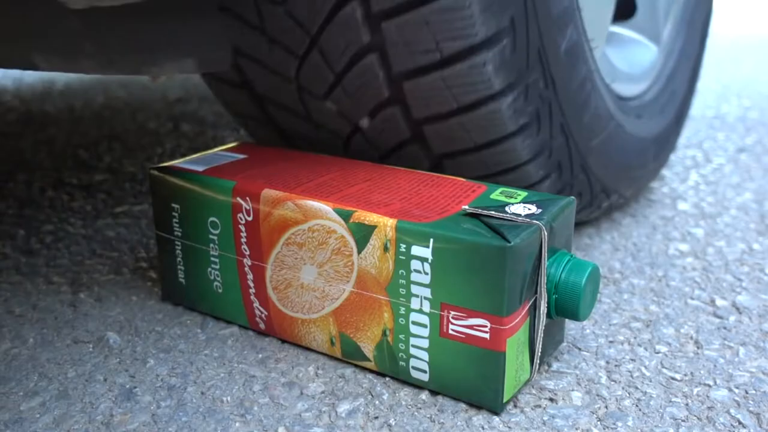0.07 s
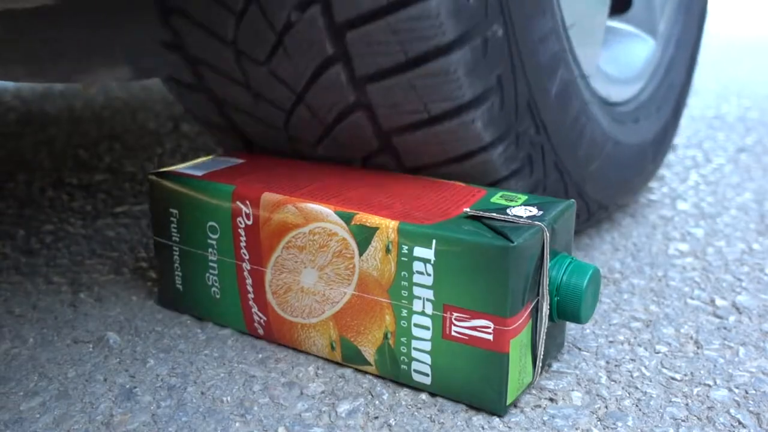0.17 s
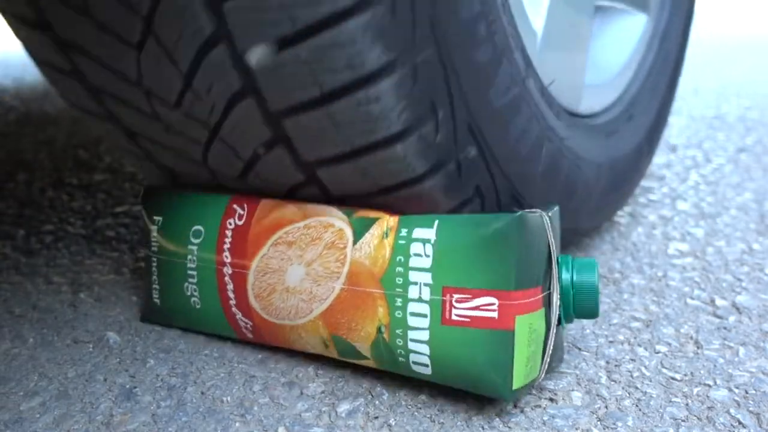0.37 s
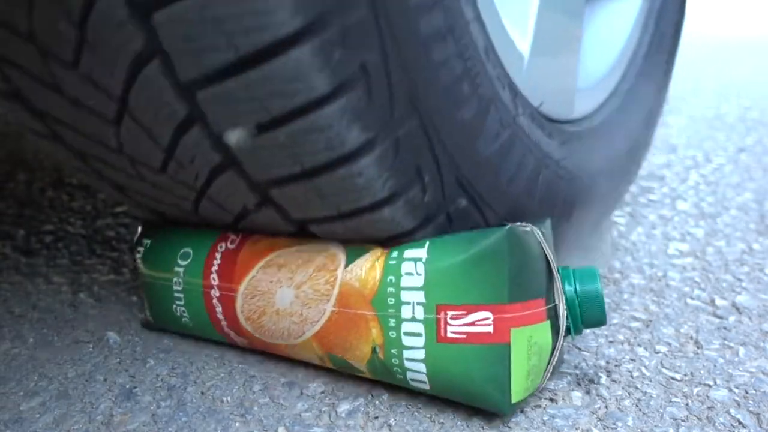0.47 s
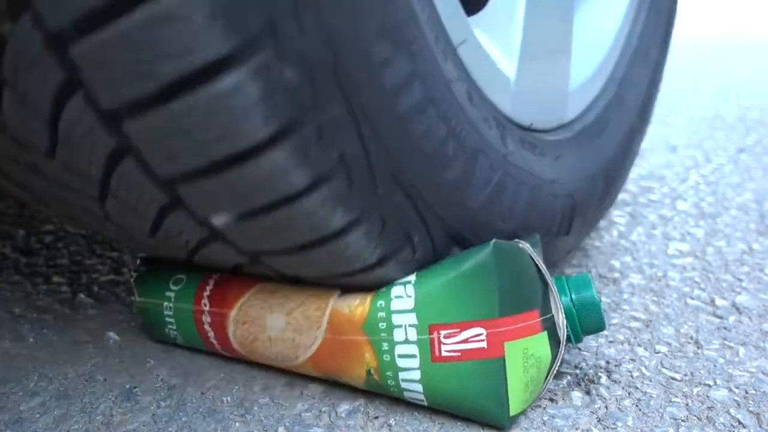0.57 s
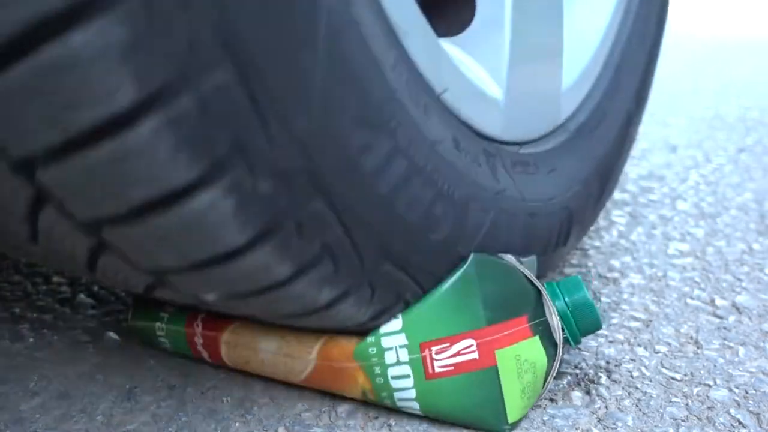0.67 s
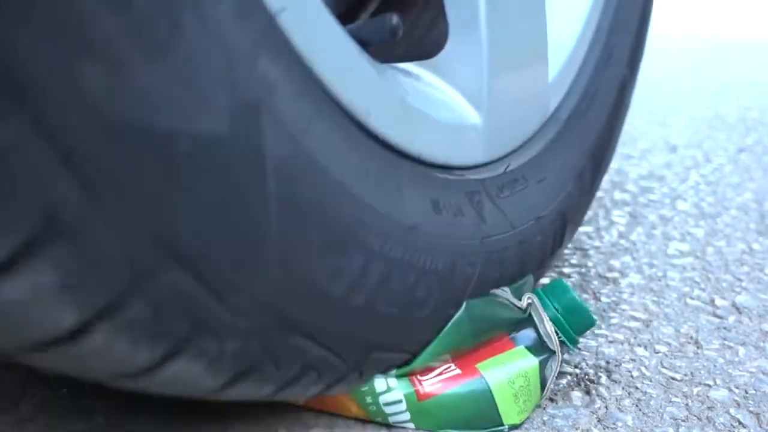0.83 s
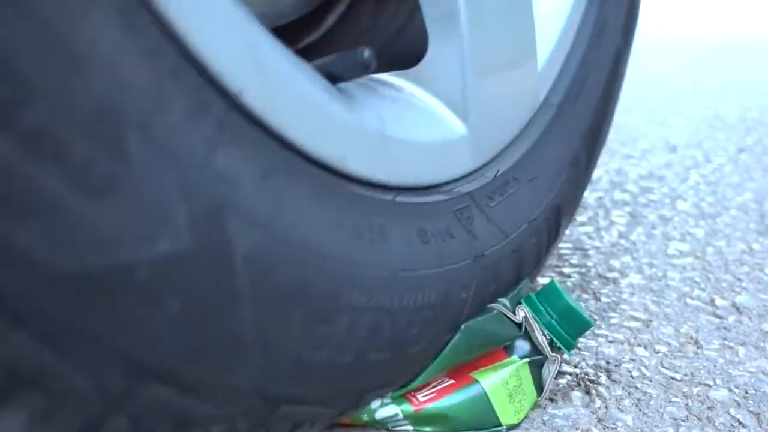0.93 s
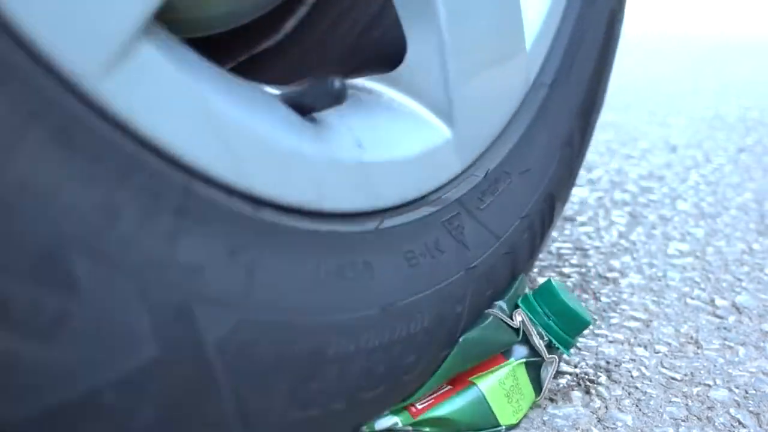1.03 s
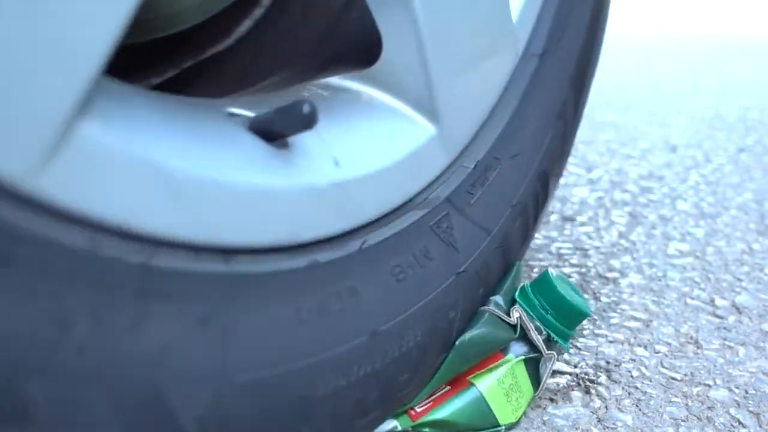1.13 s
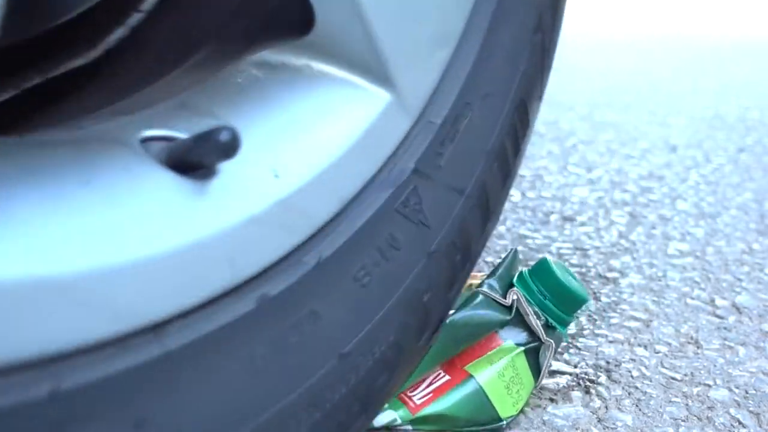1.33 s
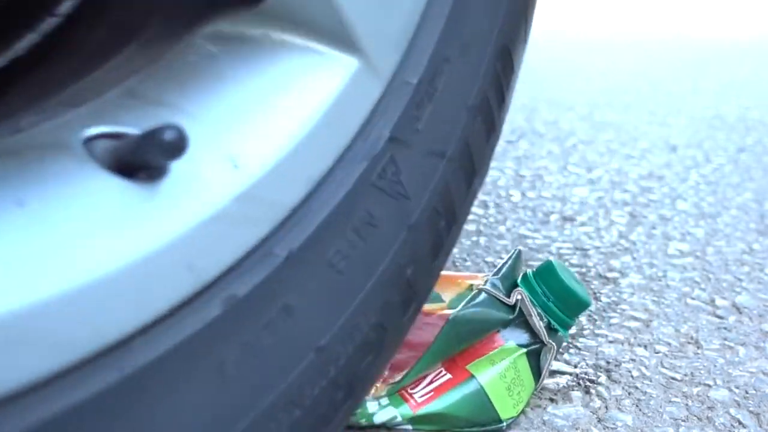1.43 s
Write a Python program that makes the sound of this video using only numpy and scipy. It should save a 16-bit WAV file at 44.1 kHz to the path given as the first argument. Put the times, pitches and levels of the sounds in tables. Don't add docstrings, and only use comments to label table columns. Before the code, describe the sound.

A drink carton is crushed by a car tyre, very close and dry, outdoors. Faint street hum until 0.2 s, then a dense burst of hollow booms, sharp cracks and creasing to 0.4. At 0.45 a seam pops and flutters; bright hissing air with short gliding whistles swells from 0.5 to 0.9, then fades. Card ticks from 0.97, cap snaps at 1.08, then faint rustle and gritty rolling to about 1.5.

```python
import sys
import numpy as np
from scipy import signal
from scipy.fft import rfft, irfft
from scipy.io import wavfile
from scipy.ndimage import uniform_filter1d

SR = 44100
rng = np.random.default_rng(int(sys.argv[2]) if len(sys.argv) > 2 else 0)


def generate_wav(signal):
    frames = np.transpose(np.atleast_2d(signal))
    scaled = np.clip(frames, -1, 1) * 32767
    pcm = np.round(scaled).astype(np.int16)
    wavfile.write(sys.argv[1], SR, pcm)


def field_ratio(decibels):
    return 10 ** (np.asarray(decibels, dtype=float) / 20)


N = 66150
BAND_EDGE_HZ = 11100


def evened(x):
    return x / np.sqrt(np.mean(x ** 2) + 1e-20)


def read(points, hz):
    f, value = np.transpose(points)
    return np.interp(np.log(hz + 1), np.log(f + 1), value)


def curve(rows, t, axis=1):
    rows = np.array(rows)
    return np.interp(t, rows[:, 0], rows[:, axis])


def add(mix, s, sound):
    part = mix[..., round(s * SR):][..., :sound.shape[-1]]
    part += sound[..., :part.shape[-1]]


def coloured(x, tone):
    gain = field_ratio(read(tone, np.fft.rfftfreq(x.shape[-1], 1 / SR)))
    return irfft(rfft(x) * gain, x.shape[-1])


def resonate(x, hz, width):
    turn = np.exp(2j * np.pi * np.cumsum(hz * np.ones(x.shape[-1])) / SR)
    r = np.exp(-np.pi * width / SR)
    return 2 * (turn * signal.lfilter([1 - r], [1, -r], x / turn + 1e-18)).real


def ring(x, hz, width):
    return resonate(resonate(x, hz, width), hz, 2 * width)


def modes(drive, table):
    return evened(sum(field_ratio(db) * evened(ring(drive, f, w)) for f, w, db in table))


# (f/Hz, level/dB)
STREET_TONE = [(25, -2), (70, -5), (120, -6), (350, -18), (600, -12), (950, -25), (2800, -26),
               (11000, -44.5)]
# (f/Hz, level/dB)
ROLL_TONE = [(30, -28), (90, -1.5), (300, -12.5), (1200, -11), (2300, -13.5), (3500, -22), (5300, -30.5),
             (11000, -41.5)]
# (t/s, level/dB)
ROLL_LEVEL = [
    (1.15, -52.5),
    (1.25, -55),
    (1.41, -49),
    (1.46, -53.5),
]
STREET_DB, STREET_FADE_S = -52.5, 0.42


def street():
    t = np.arange(N) / SR
    noise = rng.standard_normal((2, 3, N))
    wide = noise[:, :1] + coloured(noise[:, 1:], [(100, -21.5), (1000, -6.0), (6000, 2.5)])
    rolling = np.clip(t / STREET_FADE_S - 1, 0, 1)
    lumps = field_ratio(evened(uniform_filter1d(rng.standard_normal(N), size=2000)))
    hum = evened(coloured(wide[0], STREET_TONE)) * field_ratio(STREET_DB) * (1 - rolling)
    tyre = evened(coloured(wide[1], ROLL_TONE)) * field_ratio(curve(ROLL_LEVEL, t)) * rolling
    return lumps * (hum + tyre)


# (f/Hz, width/Hz, level/dB)
RUSTLE_FOLDS = [(1940, 310, -0.5), (3010, 330, -4.5), (4090, 460, -1)]
RUSTLE_S, RUSTLE_LEN_S, RUSTLE_DB = 1.25, 0.23, -51.5


def rustle():
    u = np.arange(0, 1, 1 / (SR * RUSTLE_LEN_S))
    noise = rng.standard_normal((4, 16000))
    unsteady = field_ratio(3.3 * evened(uniform_filter1d(noise[3], size=300)))
    drive = (noise[0] + 0.35 * noise[1:3]) * unsteady
    swell = np.sin(np.pi * u ** 1.66) ** 2
    return RUSTLE_S, field_ratio(RUSTLE_DB) * swell * modes(drive, RUSTLE_FOLDS)[:, :len(u)]


# (f/Hz, width/Hz, level/dB)
CAP_MODES = [(5600, 1200, 1), (3900, 700, -2), (2700, 700, -4), (790, 400, -9), (6900, 900, -6),
             (8200, 1500, -14)]
CAP_S, CAP_DB, CAP_T60_S, CAP_LOW_HZ = 1.0750, -18, 0.012, 500
CAP_CLICK_DB, CAP_BITE_DB, CAP_TAIL = -2.5, 22, 0.086


def cap():
    t = np.arange(2000) / SR
    noise = rng.standard_normal((3, 2000))
    noise = noise[0] + 0.38 * noise[1:] + field_ratio(CAP_BITE_DB) * (np.arange(2000) == 4)
    rings = modes(noise, CAP_MODES) * (1 + CAP_TAIL * field_ratio(50 * t / CAP_T60_S))
    click = field_ratio(CAP_CLICK_DB) * np.exp(-t / 0.00054) * np.clip(noise, -4, 4)
    snap = field_ratio(CAP_DB - 60 * t / CAP_T60_S) * (rings + click)
    snap = signal.lfilter(*signal.butter(2, CAP_LOW_HZ, "high", fs=SR), snap)
    return CAP_S, snap * np.array([[.84], [1.19]])


# (f/Hz, correlation/1)
PORT_LIKENESS = [(60, 0.94), (1200, 0.9), (2600, 0.98), (5500, 0.68), (11600, 0.86)]
# (f/Hz, phase/rad)
PORT_LAG = [(2900, -0.048), (5000, -0.96), (11000, -1.41)]


def hiss(field_db, patchy_db, flicker_db):
    frames, hz = N // 64 + 5, np.fft.rfftfreq(256, 1 / SR)[:, None]
    a, b, c, d, patches = rng.standard_normal((frames, 129, 5)).T
    t = np.arange(frames)[None] * 64 / SR
    gain = field_ratio(field_db(hz, t)) * (hz < BAND_EDGE_HZ) * np.ones_like(a)
    gain = gain / np.sqrt((gain ** 2).mean(0))
    flicker = evened(uniform_filter1d(patches[:1], size=4, axis=1))
    patches = uniform_filter1d(patches, size=4, axis=0)
    patches = evened(uniform_filter1d(patches, size=20, axis=1))
    same = np.clip(read(PORT_LIKENESS, hz), -1, 1)
    left = a + 1j * b
    right = same * left + np.sqrt(1 - same ** 2) * (c + 1j * d)
    right = right * np.exp(-1j * read(PORT_LAG, hz))
    z = np.array([left, right]) * gain * field_ratio(patchy_db * patches + flicker_db * flicker)
    return evened(signal.istft(z, nperseg=256, noverlap=192)[1][:, :N])


# (f/Hz, level/dB)
SLIT_TONE = [(59, -48), (100, -25.5), (661, -13), (1480, -8.5), (1700, -6), (6470, 2.5), (11000, 2),
             (14300, -26), (22000, -120)]
# (f/Hz, level/dB)
GAP_TONE = [(59, -57.5), (100, -14.5), (553, -19.5), (635, -1.5), (1770, -4), (4200, -3), (11000, -12.5),
            (14300, -41.5), (22000, -120)]
# (t/s, f/Hz)
MOUTH = [
    (.62, 8800),
    (.80, 5640),
    (.93, 3900),
]
# (t/s, level/dB, gap opening/1)
JET_FLOW = [(.462, -53, .2), (.482, -37.5, 0.3), (.492, -29.5, 1), (.51, -26.5, 0.01), (.55, -30.5, 0.37),
            (.585, -24.5, 0.11), (.61, -29.5, 0.22), (.68, -21.5, 0.23), (.81, -22, 0.55),
            (.855, -22, 0.27), (.93, -33, 0.89), (.965, -37.5, 1.1), (1.08, -41, 1.38), (1.15, -59.5, 1)]
MOUTH_DB, MOUTH_OCTAVES = 4.5, 0.49


def air_colour(hz, s):
    octaves = np.log2((hz + 1) / curve(MOUTH, s))
    mouth = np.exp(-(octaves / MOUTH_OCTAVES) ** 2) * np.clip((s - MOUTH[0][0]) * 20, 0, 1)
    slit, gap = read(SLIT_TONE, hz), read(GAP_TONE, hz)
    return slit + curve(JET_FLOW, s, axis=2) * (gap - slit) + MOUTH_DB * mouth


# (t/s, length/s, start f/Hz, end f/Hz, level/dB)
EDGE_TONES = [(.610, .032, 10400, 10300, -35), (.650, .053, 8300, 7950, -26), (.655, .042, 7150, 7100, -30),
              (.692, .02, 6600, 5900, -28), (.735, .032, 6600, 6350, -29), (.765, .06, 5600, 4850, -31),
              (.775, .028, 10800, 10300, -33), (.826, .038, 9200, 9800, -31), (.82, .035, 5700, 6400, -32),
              (.715, .03, 9300, 8000, -33), (.80, .03, 10000, 9400, -34)]
# (f/Hz, left minus right level/dB)
SIDE_BALANCE = [(60, 0.5), (830, -0.5), (11600, -2)]
# (t/s, left minus right level/dB)
JET_SWING = [
    (.5, 0),
    (.538, -2),
    (.676, 0),
    (.708, -1),
    (.852, -0.5),
    (1.0, 1),
]
WHISTLE_WIDTH_HZ, WHISTLE_DB = 180, 4


def jet():
    t = np.arange(N) / SR
    air = hiss(air_colour, patchy_db=1.4, flicker_db=0.5)
    out = air * field_ratio(curve(JET_FLOW, t)) * (t > JET_FLOW[0][0]) * (t < JET_FLOW[-1][0])
    edge = hiss(lambda hz, s: 0 * hz, patchy_db=0, flicker_db=0)
    for start, length, hz0, hz1, db in EDGE_TONES:
        u = np.arange(0, 1, 1 / (SR * length))
        hz = hz0 + (hz1 - hz0) * u
        tone = ring(edge[:, round(start * SR):][:, :len(u)], hz, WHISTLE_WIDTH_HZ)
        add(out, start, field_ratio(db + WHISTLE_DB) * np.sin(np.pi * u) ** .5 * evened(tone))
    left = coloured(out[0], [(f, db / 2) for f, db in SIDE_BALANCE])
    right = coloured(out[1], [(f, -db / 2) for f, db in SIDE_BALANCE])
    return np.array([left, right]) * field_ratio(curve(JET_SWING, t) * np.array([[.5], [-.5]]))


# (t/s, level/dB)
CREASE_LEVEL = [
    (.205, -62.5),
    (.214, -32),
    (.26, -30),
    (.30, -29.5),
    (.37, -31),
    (.41, -39),
    (.45, -38.5),
    (.50, -37),
    (.525, -45.5),
]
# (f/Hz, level/dB)
CREASE_COLOUR = [(35, -35.5), (70, -11), (200, 8), (450, 5), (877, -1.5), (1220, -6.5), (3780, -16),
                 (11000, -32.5), (14300, -50), (22000, -120)]
CREASES_PER_S, CREASE_SPREAD_DB, CREASE_S = 1400, 4.5, 0.0024


def creasing():
    t = np.arange(N) / SR
    draw = rng.random((N, 2)).T
    sizes = field_ratio(-CREASE_SPREAD_DB * np.log(0.22 + draw[0])) * (draw[1] < CREASES_PER_S / SR)
    sizes = signal.lfilter([1], [1, -np.exp(-1 / (SR * CREASE_S))], sizes)
    noise = rng.standard_normal((3, N))
    grains = evened(coloured(sizes * (noise[0] + 0.065 * noise[1:]), CREASE_COLOUR))
    loaded = (t > CREASE_LEVEL[0][0]) * (t < CREASE_LEVEL[-1][0])
    return grains * field_ratio(curve(CREASE_LEVEL, t)) * loaded


# (f/Hz, width/Hz, level/dB)
SEAM_MODES = [(904, 71, 7.5), (683, 475, 7), (1186, 270, -6.5), (340.7, 390, -3), (2500, 1200, -5)]
FLUTTER_S, FLUTTER_LEN_S, FLUTTER_DB, FLUTTER_FADE_DB = .4575, 0.041, -19.5, -13


def flutter():
    u = np.arange(0, 1, 1 / (SR * FLUTTER_LEN_S))
    seam = modes(rng.standard_normal(4000)[:len(u)], SEAM_MODES)
    ramps = np.clip(np.minimum(20 * u, 8 - 8 * u), 0, 1)
    return FLUTTER_S, field_ratio(FLUTTER_DB + FLUTTER_FADE_DB * u ** 2) * seam * ramps


# (f/Hz, level/dB)
SNAP_TONE = [(300, -28.5), (900, -1), (3000, -12), (11000, -23.5)]
BITE_DB = 11


def crack(noise, start, db, hz, t60, wide_db, width):
    t = np.arange(noise.shape[-1]) / SR
    noise = noise[0] + .45 * noise[1:] + field_ratio(BITE_DB) * (np.arange(len(t)) == 8)
    body = evened(ring(noise, hz, width * hz)) + field_ratio(wide_db) * evened(coloured(noise, SNAP_TONE))
    return start, field_ratio(db - 8.5 - 60 * t / t60) * np.minimum(t / 0.00028, 1) * body


PUSH_DB, PUSH_STRETCH = -19, 1.26


def boom(start, length, db, hz, skew):
    t = np.arange(0, length * PUSH_STRETCH, 1 / SR)
    hump = np.sin(np.pi * np.clip(t / length, 0, 1) ** skew) ** 3.35
    push = field_ratio(PUSH_DB) * np.sin(np.pi * t / t[-1]) * np.sin(4 * np.pi * t / t[-1])
    return start, field_ratio(db) * (hump * np.sin(2 * np.pi * hz * t) + push)


# (t/s, length/s, peak level/dB, f/Hz, slowness of the rise 0-1)
BUCKLES = [(0.2131, 0.007, -9, 418, 0.77), (0.2195, 0.011, -9, 448, 0.89), (.232, 0.0089, -16, 377, 0.73),
           (0.241, 0.0094, -16.5, 450, 0.94), (0.248, 0.0067, -22, 425, 0.7),
           (0.2650, 0.017, -8, 435, 0.62), (0.2790, 0.0073, -10, 590, 0.37),
           (.2815, .012, -16.5, 1020, 0.67), (.2845, 0.009, -13.5, 571, 0.98),
           (0.289, 0.02, -17.5, 403, .7), (0.313, .007, -18.5, 294, 0.7), (0.3226, 0.0068, -6.5, 403, .83),
           (.328, 0.008, -25, 500, 0.8), (0.339, 0.0084, -9.5, 463, .8), (0.3568, 0.019, -10, 401, .45),
           (0.375, 0.011, -21, 450, .9), (0.4539, 0.0046, -6.5, 597, 0.69), (0.5, 0.0036, -13.5, 416, .83),
           (0.506, 0.0059, -28.5, 447, 1), (.522, 0.0043, -25.5, 600, 0.9),
           (0.808, 0.012, -35.5, 290, 0.64), (.827, 0.0053, -27, 430, 0.68), (1.48, 0.0079, -38, 250, 1)]
# (t/s, peak level/dB, ring f/Hz)
FOLD_CRACKS = [(0.2112, -35, 2560), (0.2157, -26.5, 2300), (0.2216, -32, 2500), (0.2487, -22.5, 3100),
               (0.2656, -24.5, 2740), (0.2793, -11, 2740), (0.2813, -21.5, 6200), (0.29, -29, 6200),
               (0.3200, -16.5, 2540), (.3240, -25.5, 4500), (0.3366, -25.5, 7500), (.3390, -5.5, 2510),
               (0.3419, -13.5, 2400), (0.3581, -17.5, 2600), (.3585, -26.5, 5980), (0.3871, -27, 3800),
               (0.3990, -28.5, 7400), (0.41, -27, 3700), (.429, -35.5, 8000), (0.4543, -11, 2500),
               (0.5027, -17, 2500), (0.5058, -22, 3350), (0.509, -14.5, 2700)]
# (t/s, peak level/dB, ring f/Hz)
CARD_TICKS = [(.8275, -27.5, 790), (0.9694, -16.5, 1440), (.9725, -23, 1600), (.9797, -21.5, 1470),
              (.9825, -21.5, 1280), (.991, -29, 2500), (.998, -28, 3200), (1.0055, -27, 2500),
              (1.0078, -22, 2300), (1.0182, -26, 1300), (1.0275, -23, 1010), (1.038, -26, 2500),
              (1.044, -26, 1104), (1.048, -26, 1160), (1.053, -29, 1100), (1.064, -29.5, 7460),
              (1.0795, -26.5, 3000), (1.085, -31, 2500), (1.092, -30, 2820), (1.108, -33, 1220),
              (1.167, -46, 1177), (1.185, -45, 3600), (1.218, -34, 840), (1.220, -39, 2400),
              (1.256, -46.5, 3000), (1.281, -46, 2000), (1.325, -49, 5300), (1.330, -44, 4200),
              (1.330, -49.5, 7200), (1.352, -51, 3500), (1.366, -42, 4200), (1.448, -45, 2200),
              (1.482, -50, 4500)]


def carton():
    hollow, out = np.zeros(N), np.zeros((2, N))
    for row in BUCKLES:
        add(hollow, *boom(*row))
    for row in FOLD_CRACKS:
        add(out, *crack(rng.standard_normal((3, 3000)), *row, t60=.016, wide_db=-4, width=0.53))
    for row in CARD_TICKS:
        add(out, *crack(rng.standard_normal((3, 3000)), *row, t60=.021, wide_db=-11, width=.4))
    add(hollow, *flutter())
    return out + hollow + creasing()


TAIL_DB, TAIL_T60_S = -8.5, 0.073


def space(x):
    t = np.arange(8000) / SR
    taps = np.sign(rng.standard_normal((2, 8000))) * (rng.random((2, 8000)) < .05)
    taps = taps * field_ratio(-60 * t / TAIL_T60_S) * (t > .004)
    taps = field_ratio(TAIL_DB) * taps / np.linalg.norm(taps[0])
    taps = taps[0] + coloured(taps - taps[0], [(300, -12.0), (3000, 4)])
    return x + signal.fftconvolve(x, taps, axes=1)[:, :N]


def scene():
    body = coloured(carton(), [(30, -37.5), (80, 0.5)])
    mix = street() + space(body) + jet()
    add(mix, *cap())
    add(mix, *rustle())
    return mix


def top_cut(x):
    return signal.sosfilt(signal.butter(12, 16280, fs=SR, output="sos"), x)


# (f/Hz, level/dB)
BAND_LEAK = [(11100, -26), (12300, -30), (16000, -38)]


def record(dry):
    lowpass = signal.firwin(301, BAND_EDGE_HZ, window=("kaiser", 7), fs=SR)
    low = signal.oaconvolve(dry, lowpass[None], "same")
    return top_cut(low + coloured(dry - low, BAND_LEAK))


dry = scene()
out = record(dry)
generate_wav(out)
```